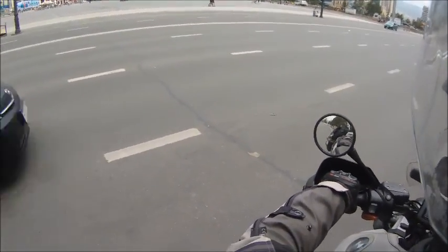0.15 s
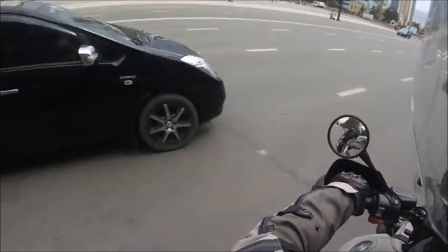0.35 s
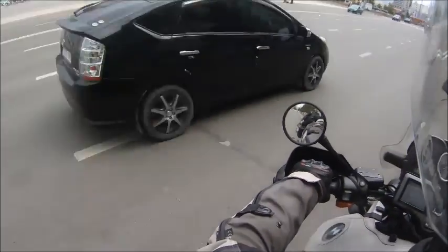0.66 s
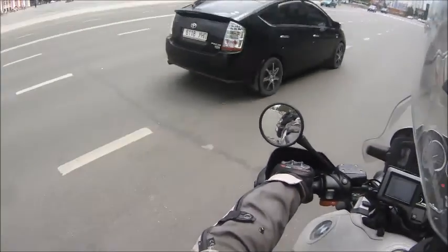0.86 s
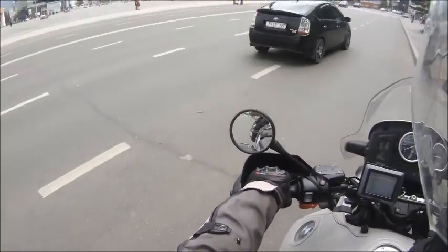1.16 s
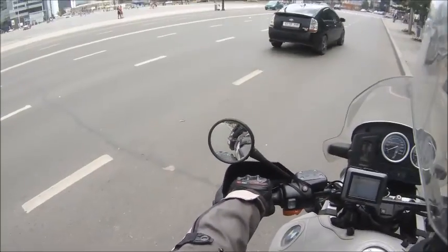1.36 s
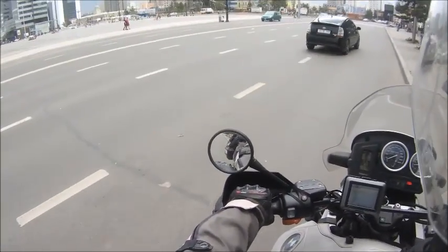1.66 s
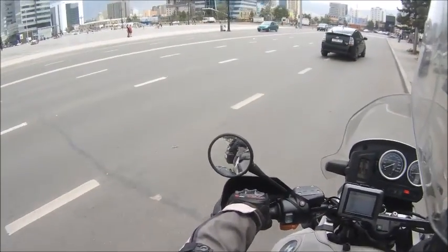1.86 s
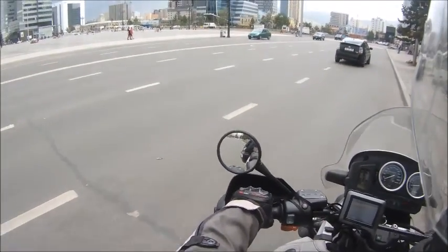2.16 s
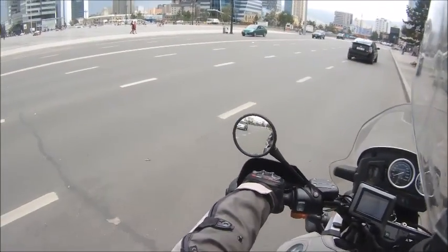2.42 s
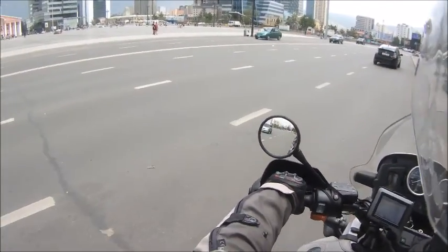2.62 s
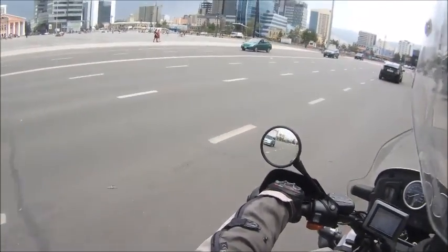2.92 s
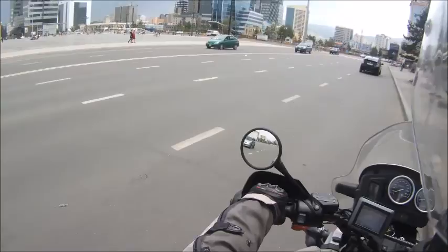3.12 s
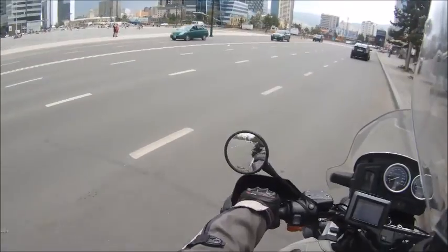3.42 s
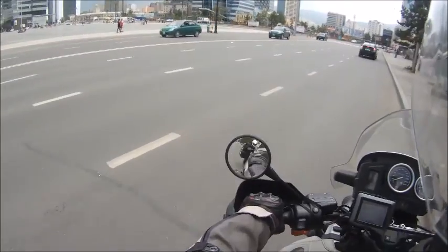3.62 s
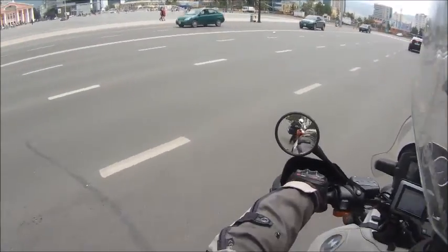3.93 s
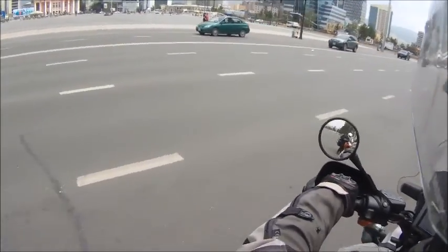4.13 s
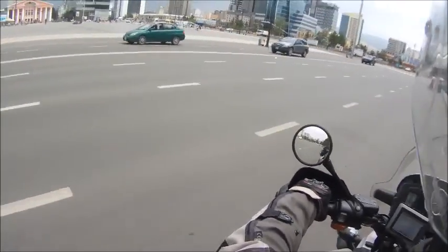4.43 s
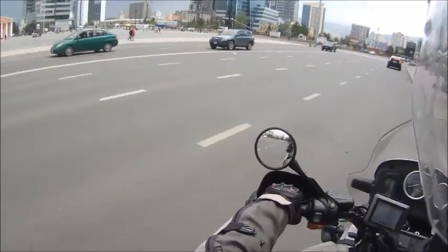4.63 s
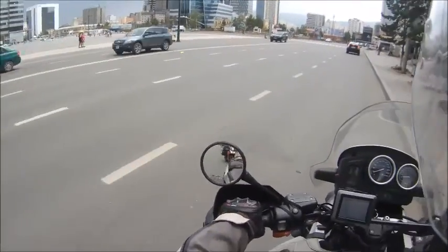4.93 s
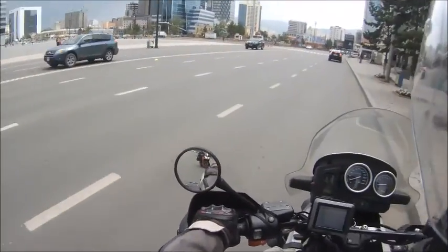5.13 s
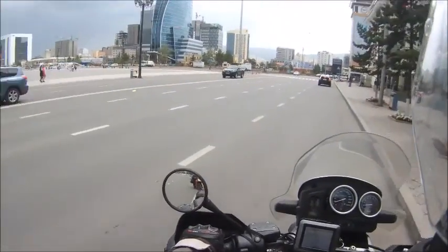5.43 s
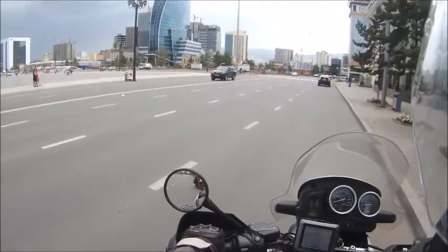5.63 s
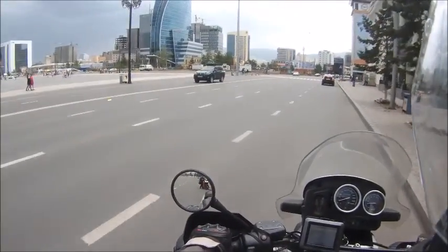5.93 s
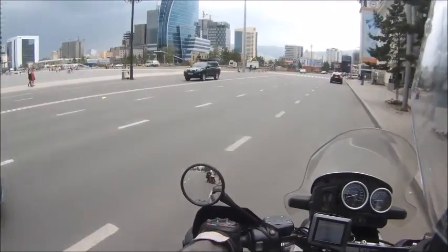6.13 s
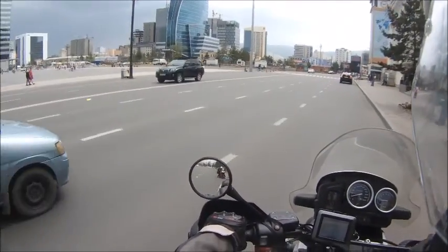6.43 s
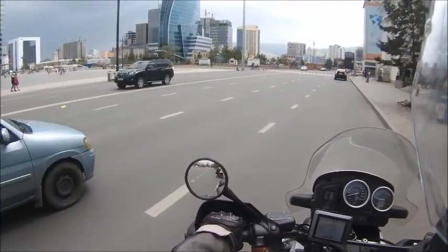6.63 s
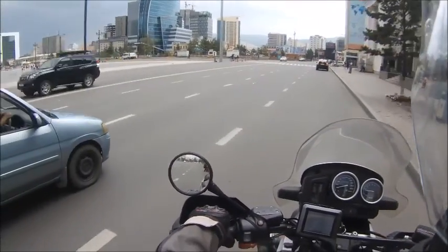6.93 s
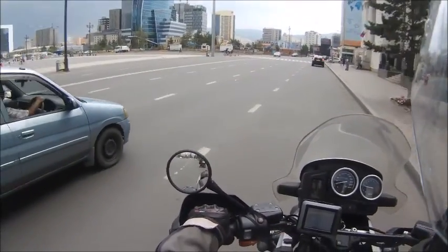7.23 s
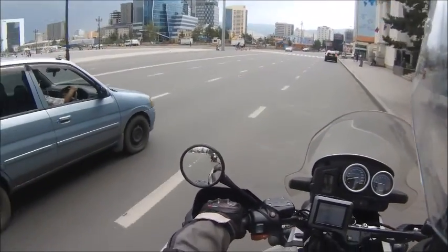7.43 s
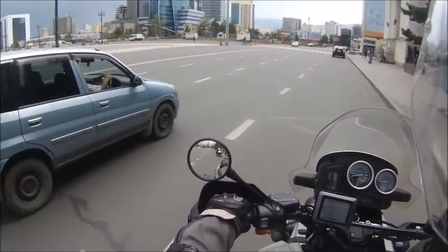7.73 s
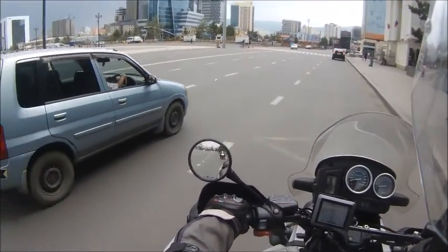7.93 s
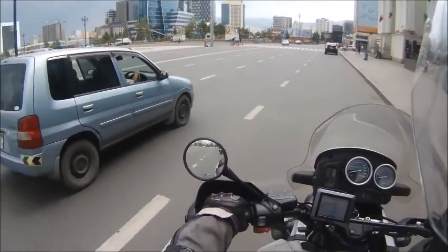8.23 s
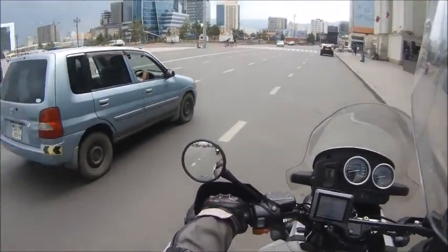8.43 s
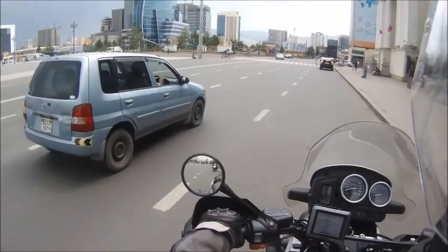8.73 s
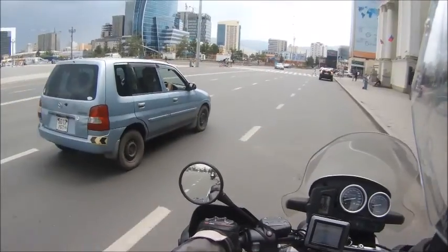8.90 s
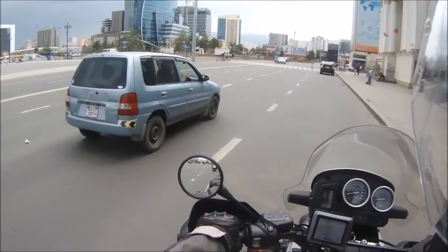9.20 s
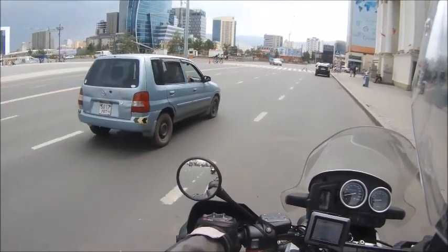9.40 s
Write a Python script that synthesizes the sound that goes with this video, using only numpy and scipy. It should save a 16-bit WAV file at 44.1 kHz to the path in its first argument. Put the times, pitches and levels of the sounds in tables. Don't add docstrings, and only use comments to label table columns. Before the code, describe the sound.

Brake squeal tail and passing tyres, a thumping motorcycle engine climbing slowly in revs, then chain chatter, rough idle and hard slaps of wind.

```python
import sys
import numpy as np
from scipy import signal
from scipy.fft import rfft, irfft, next_fast_len
from scipy.io import wavfile
from scipy.ndimage import uniform_filter1d

SR = 44100
rng = np.random.default_rng(int(sys.argv[2]) if len(sys.argv) > 2 else 0)


def gain_from_db(level_db):
    decades = np.asarray(level_db, float) / 20
    return 10 ** decades


def generate_wav(sig):
    pcm = np.round(np.clip(np.atleast_2d(sig).T, -1, 1) * 32767).astype(np.int16)
    wavfile.write(sys.argv[1], SR, pcm)


N = 421596


def read(table):
    s, *columns = np.transpose(table)
    return [np.interp(np.arange(N) / SR, s, c) for c in columns]


def unit(x):
    return x / np.sqrt(np.mean(x ** 2))


def colour(x, spectrum):
    hz, db = np.transpose(spectrum)
    grid = np.log(np.fft.rfftfreq(N, 1 / SR) + 1)
    return irfft(rfft(x) * gain_from_db(np.interp(grid, np.log(hz), db)), N)


def ring(x, hz, width):
    return signal.lfilter(*signal.iirpeak(hz, hz / max(width, 1), fs=SR), x)


def walk(rate):
    k = int(SR / rate)
    held = np.repeat(rng.standard_normal(N // k + 1), k)
    return unit(uniform_filter1d(uniform_filter1d(held, k), k)[:N])


def patchy(spectrum, shared_db, own_db, own_rate):
    size = next_fast_len(N)
    noise = rfft(colour(rng.standard_normal(N), spectrum), size)
    place = 1.5 * np.log2(np.fft.rfftfreq(size, 1 / SR) / 20 + 1)
    loud = np.bincount(np.round(place).astype(int), abs(noise) ** 2)
    out = 0
    for band in np.flatnonzero(loud > loud.max() * 1e-5):
        sound = irfft(noise * np.clip(1 - abs(place - band), 0, 1), size)[:N]
        out = out + sound * gain_from_db(own_db * walk(own_rate))
    return unit(out * gain_from_db(shared_db))


def causal(spectrum, size=32768):
    hz, db = np.transpose(spectrum)
    grid = np.log(np.fft.rfftfreq(size, 1 / SR) + 1)
    cepstrum = irfft(np.log(gain_from_db(np.interp(grid, np.log(hz), db))))
    cepstrum[1:size // 2] *= 2
    cepstrum[size // 2 + 1:] = 0
    return irfft(np.exp(rfft(cepstrum)))[:size // 4]


def by_revs(hz, cruise_db, per_octave_db):
    return cruise_db + per_octave_db * np.log2(hz / 20)


def add_db(*levels):
    return 10 * np.log10(sum(gain_from_db(db) ** 2 for db in levels))


def squeal():
    end_s, hz, level_db = .083, 3490, -79.5
    t = np.arange(N) / SR
    fade = np.clip((end_s - t) / 0.015, 0, 1)
    phase = 2 * np.pi * np.cumsum(hz * (1 + 0.003 * walk(60) - .08 * t)) / SR
    return gain_from_db(level_db) * fade * (np.sin(phase) + gain_from_db(-8) * np.sin(1.39 * phase))


def exhaust(cycles, hz, thump_db, gas_db, shade):
    at = np.flatnonzero(np.diff(np.floor(cycles)))
    turn = -(-1.) ** np.arange(len(at))
    chance = rng.standard_normal((len(at), 2)).T
    idle = hz[at] < 17.
    late_s = 0.0003 * turn + (0.000095 + 0.0022 * idle) * chance[0]
    uneven_db = 1. + .3 * idle - .55 * (hz[at] > 24)
    blows = np.zeros(N)
    where = np.clip(at + (late_s * SR).astype(int), 0, N - 1)
    blows[where] = gain_from_db((.5 - 3.5 * idle) * turn + uneven_db * chance[1])
    push = uniform_filter1d(blows * gain_from_db(thump_db), int(0.002 * SR))

    # freq_hz, level_db
    silencer = [(5, -53.5), (20, -54), (38, -7.5), (62, -10.5), (85, -2.5), (104, 0.5), (124, -1.5),
                (142, -11.5), (180, -20.5), (300, -43), (620, -39), (680, -45), (760, -46), (1500, -55.5)]
    response = causal(silencer)
    thump = -signal.fftconvolve(push, response / np.abs(response).max())[:N]
    vent_hz, vent_lead_s = 22, .0037
    bend = np.tan(np.pi * vent_hz / SR)
    pole = (bend - 1) / (bend + 1)
    thump = np.roll(signal.lfilter([pole, 1], [1, pole], thump), -int(vent_lead_s * SR))
    heat = np.clip((hz - 22) / 9, 0, 1)
    hot_note = 0.91 * heat * ring(thump, 125.6, 33)
    thump = (1 - 0.57 * heat) * thump + hot_note + 0.66 * ring(thump, 110.2, 13)

    since_strong = cycles - np.round(cycles[at[1]])
    push = push * gain_from_db(2.3 * (1.5 - heat) * np.cos(np.pi * since_strong))
    bark = np.roll(ring(ring(push, 463, 270), 422, 200), int(-.001 * SR))
    cool_pipe = (1 - heat) * ring(ring(push, 235, 250), 235, 50) * 1.15
    hot_pipe = heat * ring(ring(push, 250, 70), 250, 36) * 1.2
    header = np.roll(cool_pipe + hot_pipe, int(-.002 * SR))
    orders = 2 * np.pi * np.outer([8, 9], cycles)
    pair = np.concatenate([np.cos(orders), np.sin(orders)])
    clear = np.sum(pair * uniform_filter1d(pair * header, SR // 8), axis=0)
    header = header + 1.8 * np.sqrt(heat) * clear
    whine = np.sin(47 * np.pi * cycles) + .7 * np.sin(56 * np.pi * cycles)
    gears = gain_from_db(-8 + 3 * walk(5)) * heat * whine

    puff_s = .0085
    puff = np.exp(4 * np.cos(2 * np.pi * (cycles - puff_s * hz)) - 4)
    gas = colour(rng.standard_normal(N), [(60, -29.0), (240, -2.5), (450, 5.0), (700, -12.5),
                                          (1500, -13.0), (3000, -37.0), (5000, -97)])
    whistle = gain_from_db(-10.5 + 2.5 * walk(15)) * unit(ring(gas * (.25 + puff), 690, 40))
    weaker = np.round(cycles) % 2 == np.round(cycles[at[0]]) % 2
    strokes = np.roll(blows * weaker, int(.008 * SR))
    tail_db = -3 - 1.2 * abs(hz - 19.5).clip(0, 4)
    whistle = whistle + gain_from_db(tail_db) * unit(ring(ring(strokes, 678, 60), 678, 30))
    chuff = gain_from_db(-3) * unit(puff * ring(ring(rng.standard_normal(N), 430, 350), 430, 350))
    rush = unit(gas * (1.7 + puff)) + chuff + shade * whistle + gears
    return gain_from_db(11.0) * thump + gain_from_db(45.0 + 2.8 * heat) * (header + gain_from_db(-8) * bark) + gain_from_db(gas_db) * rush


def valve_gear(cycles, hiss_db, tick_db):
    # freq_hz, density_db (dB per Hz)
    hiss_shape = [(1200, -25), (2200, -1), (3500, -3), (6300, -2), (9000, -6), (12500, -8.5), (13300, -4.5),
                  (15300, -3), (15600, -60)]
    # freq_hz, width_hz, level_db
    casing = [(3770, 130, -19), (4680, 25, 9), (4820, 85, 4), (6300, 220, -6), (6900, 44, 4),
              (8250, 84, -5), (9150, 150, -3), (10000, 150, -2)]
    throb = gain_from_db(1.3 * np.cos(2 * np.pi * cycles) + 1.0 * np.cos(4 * np.pi * (cycles - .06)))
    hiss = patchy(hiss_shape, 0.35 * walk(27), 0.25, 8.1) * throb
    ticks = rng.standard_normal(N) * gain_from_db(3. * walk(14) + 4 * np.cos(4 * np.pi * (cycles - .1)))
    rings = sum(gain_from_db(db) * ring(ticks, hz, width) for hz, width, db in casing)
    return gain_from_db(hiss_db + 0.9) * unit(hiss) + gain_from_db(tick_db) * unit(rings)


def traffic():
    # closest_s, tyres_db, roar_over_tyres_db, tread_hiss_over_tyres_db, cover_gap_s
    cars = [
        (0.4, -68.5, 3, -15, 0.24),
        (5.1, -68.5, 4.5, -23, 0.45),
        (6.6, -73, 14, -5, 0.45),
        (7.4, -71, -0.5, -8, 0.5),
        (9.4, -84.5, -2, -1.5, 0.1),
        (.58, -81.5, 3, 2, 0.091),
    ]
    town_tyres_db, town_roar_db = -75.5, -65
    t = np.arange(N) / SR
    near = []
    for s, db, roar, hiss, gap_s in cars:
        near.append((db - 10 * np.log10(1 + ((t - s) / gap_s) ** 2), roar, hiss))
    tyre_db = add_db(town_tyres_db, *(db for db, _, _ in near))
    roar_db = add_db(town_roar_db, *(db + up for db, up, _ in near))
    return tyre_db, roar_db, add_db(*(db + up for db, _, up in near))


def street(tyre_db, roar_db):
    # freq_hz, density_db (dB per Hz)
    roar_shape = [(88, -39.5), (150, 5), (210, -2.5), (298, -4), (363, -7), (631, -9.5), (1040, -15),
                  (2520, -37), (3500, -30.5), (4550, -40), (7700, -120)]
    # freq_hz, density_db (dB per Hz)
    tyre_shape = [(400, -15), (700, -4.5), (1000, 1.5), (1750, -5), (2050, -11), (2500, -14), (3500, -23),
                  (6000, -35)]
    # freq_hz, density_db (dB per Hz)
    rumble_shape = [(4, -29), (20, -7), (40, -5), (90, 2), (200, -15), (400, -35), (900, -101)]
    roar = gain_from_db(roar_db + 2.5) * patchy(roar_shape, 1.6 * walk(6), 1.0, 12)
    tyres = gain_from_db(tyre_db + 2.5) * unit(colour(rng.standard_normal(N), tyre_shape))
    rumble = gain_from_db(-65.5) * unit(colour(rng.standard_normal(N), rumble_shape))
    return roar + tyres + rumble


def drone():
    # loudest_s, level_db, fade_s
    drones = [
        (.06, -71, 0.2),
        (5.45, -70, 0.27),
    ]
    t = np.arange(N) / SR
    level = sum(gain_from_db(db) * np.exp(-((t - s) / fade_s) ** 2) for s, db, fade_s in drones)
    return level * gain_from_db(4.8 * walk(16)) * unit(ring(rng.standard_normal(N), 900, 210))


def wind():
    # freq_hz, density_db (dB per Hz)
    eddy = [(18, -24), (40, 2), (110, 8.5), (250, 5), (370, -4.5), (520, -3), (800, -17), (1400, -59),
            (2200, -41), (3500, -72)]
    # strongest_s, level_db, rise_s, fall_s
    gusts = [(0.17, -54, 0.052, 0.1), (0.74, -55.5, 0.33, 0.09), (1.12, -51, 0.049, 0.039),
             (1.3, -60, 0.11, 0.26), (2.1, -54.5, 0.11, 0.064), (2.44, -52, 0.018, 0.019),
             (8.0, -60, 0.022, 0.025), (8.15, -50, 0.057, 0.039), (8.26, -50.5, 0.031, 0.027),
             (8.571, -51, 0.11, 0.064), (8.78, -50.5, 0.027, 0.04), (8.89, -42.5, 0.012, 0.054),
             (9.1, -50, 0.041, 0.031), (9.26, -46.5, 0.11, 0.077), (9.4, -43, 0.015, 0.013),
             (9.516, -41.5, 0.045, 0.0076), (9.555, -42, 0.0073, .05), (1.075, -49, 0.045, 0.013),
             (9.355, -57, 0.007, 0.0055)]
    # crest_s, peak_db, pitch_hz, fade_cycles
    buffets = [(8.728, -42.5, 244, 1.4), (8.767, -36.5, 269, 0.61), (8.774, -40.5, 442, 0.63),
               (8.801, -36.5, 200, 0.51), (8.833, -29.5, 454, 0.36), (8.88, -33.9, 362, 1.3),
               (8.894, -48, 221, 2.7), (8.901, -41, 442, 1.3), (8.912, -36, 525, 1.3),
               (8.925, -52, 272, 2.5), (8.942, -39, 199, 1.5), (8.947, -28.2, 530, 0.34),
               (8.972, -34, 397, 0.41), (8.983, -46, 221, 0.7), (9.003, -34.5, 297, 0.93),
               (9.033, -36.7, 328, 0.39), (9.038, -36, 297, 0.45), (9.088, -46, 269, 2.3),
               (9.094, -45.0, 366, 2.5), (9.102, -35.4, 328, 0.45), (9.115, -37.5, 244, 0.45),
               (9.123, -43.8, 362, 2.7), (9.153, -39, 406, 0.39), (9.173, -49, 244, 1.7),
               (9.189, -55, 269, 2.5), (9.213, -50, 200, 2.2), (9.254, -39.5, 530, 3.3),
               (9.262, -36.5, 362, 2.7), (9.269, -58, 297, 2.5), (9.283, -42, 297, 2.3),
               (9.294, -44.5, 400, 1.6), (9.301, -37.9, 488, 0.45), (9.324, -38, 362, 0.55),
               (9.34, -44.2, 398, 1.1), (9.35, -33, 324, 1.5), (9.359, -32, 300, 0.55),
               (9.371, -44, 328, 0.45), (9.386, -33.5, 330, 1.2), (9.399, -29.5, 362, 0.41),
               (9.403, -44, 362, 0.7), (9.411, -39, 328, 1.3), (9.418, -36, 221, 0.7),
               (9.449, -44.8, 328, 1.1), (9.476, -40, 488, 0.6), (9.491, -42, 402, 2),
               (9.505, -51, 269, 2.5), (9.511, -41, 442, 1.7), (9.522, -41, 244, 1.9),
               (9.526, -50, 362, 1.8), (9.546, -43.4, 442, 2.8)]
    # crest_s, peak_db, pitch_hz, fade_cycles
    strays = [(1.055, -44, 250, 0.54), (1.062, -45.5, 246, 1.7), (1.088, -49, 440, 2.5),
              (1.129, -40, 330, 1.1), (1.136, -43, 228, 1.7), (.892, -51, 650, 1.1),
              (5.257, -44.5, 356, 1.4), (7.756, -48.5, 200, 0.88), (7.994, -45, 286, 0.74),
              (8.106, -44, 245, .5), (8.147, -41, 250, 0.45), (8.158, -43, 406, 1.3),
              (8.167, -39, 250, 0.75), (8.208, -48, 330, .8), (8.251, -43.5, 230, 3.2),
              (8.287, -45, 305, .8), (8.472, -48, 297, 2.5), (8.484, -47, 350, 0.83),
              (8.577, -43.5, 327, 0.98), (9.554, -41, 197, 2.5), (1.125, -42.5, 735, 3.2),
              (1.127, -50, 1300, 1.5), (9.449, -51, 750, 1.1), (8.774, -51, 800, 0.97),
              (8.806, -40.5, 467, 2.7), (8.877, -38, 487, 1.2), (8.946, -33.5, 1190, 1.5),
              (8.95, -39, 700, 1), (8.947, -38.5, 2020, 2.5), (9.033, -52, 1500, 1.5),
              (8.146, -45, 690, 1.3), (9.199, -48, 700, 1), (9.037, -43, 730, 1.9),
              (9.088, -36.5, 720, 1.1), (9.249, -37.5, 660, 0.62), (9.258, -43, 714, 1.9),
              (9.347, -35.5, 655, 0.51), (9.358, -39, 810, 1.4), (9.387, -34.5, 660, 0.69),
              (9.509, -47, 646, 1.9), (9.524, -32.5, 595, 1)]
    out = np.zeros(N + SR)
    flutter = patchy(eddy, 4 * np.tanh(.6 * walk(130)) + 0.5 * walk(35), 1.5, 30)
    flutter = flutter / np.sqrt(uniform_filter1d(flutter ** 2, SR // 25) + .05)
    for s, db, rise_s, fall_s in gusts:
        late = np.arange(N) / SR - s
        pace_s = np.maximum(np.where(late < 0, rise_s, fall_s), .005)
        out[:N] += flutter * gain_from_db(db) * np.exp(-abs(late) / pace_s)

    t = np.arange(-SR // 100, SR // 30) / SR
    port = signal.butter(4, 1500, fs=SR, output="sos")
    grit = rng.standard_normal((100, len(t)))
    for (s, peak_db, hz, fall), noise in zip(list(buffets) + list(strays), grit):
        turns, fall = t * hz, max(fall, .68)
        swell = .3 + .35 * fall
        shape = np.exp(-(turns / np.where(turns < 0, swell, fall)) ** 2)
        slap = shape * np.cos(2 * np.pi * turns)
        thud = gain_from_db(-12.5) * np.exp(-(turns / 1.1) ** 2) * np.cos(2 * np.pi * (turns / 3 + 0.16))
        fray = gain_from_db(-15.5) * shape * unit(ring(noise, 2 * hz, 2 * hz))
        start = int(s * SR) - SR // 100
        out[start:start + len(t)] += gain_from_db(peak_db - 0.6) * signal.sosfilt(port, slap + thud + fray)
    return out[:N]


def clinks(cycles):
    # start_s, peak_db, pitch_hz
    metal = [
        (1.546, -64, 3190),
        (1.833, -74, 2800),
        (3.379, -58, 2830),
        (3.38, -70, 5730),
        (3.687, -66, 6670),
        (3.81, -71, 4670),
        (3.904, -63, 4680),
        (5.743, -63, 4480),
        (6.199, -77, 4830),
    ]
    start_s, end_s, chain_db, chain_hz, per_firing = 7.59, 8.2, -65.5, 3250, 1.6
    t60_s, rise_s = .075, 0.00084
    out, t = np.zeros(N + SR), np.arange(SR // 4) / SR
    swings = per_firing * (cycles - cycles[int(start_s * SR)])
    at = np.flatnonzero(np.diff(np.floor(swings + 1e-9))) / SR
    at = at[(at >= start_s - .001) & (at < end_s)]
    spread = rng.standard_normal((40, 2))
    chatter = [(s, chain_db + 2.5 * a, chain_hz * (1 + 0.018 * b)) for s, (a, b) in zip(at, spread)]
    shakes = rng.standard_normal((48, len(t)))
    for (s, peak_db, hz), shake in zip(list(metal) + chatter, shakes):
        shake = shake * np.exp(-np.log(1000) * t / t60_s) * np.minimum(t / rise_s, 1)
        sound = ring(shake, hz, 300) + 0.6 * (hz < 3000) * ring(shake, 2 * hz, 500)
        sound = sound + .35 * np.exp(-t / .004) * ring(shake, 1.4 * hz, 1.2 * hz)
        start = int(s * SR)
        out[start:start + len(t)] += gain_from_db(peak_db - 1.5) * sound / np.abs(sound).max()
    return out[:N]


def two_ports(mid):
    # freq_hz, side_minus_mid_db
    width = [(60, -65), (110, -74), (200, -54), (380, -29.5), (690, -25.5), (1270, -25), (2340, -13.5),
             (4320, -12.5), (7950, -11.5), (14600, -5.5)]
    paths = rng.standard_normal(8000) * np.exp(-np.arange(8000) / 2200)
    scattered = signal.fftconvolve(mid, paths / np.linalg.norm(paths))[:N]
    side = gain_from_db(2.0) * colour(scattered, list(width[:-1]) + [(12600, -12.0), (12800, -71)])
    side = side + gain_from_db(-48.0 + 13 * walk(15)) * ring(scattered, 260, 200)
    return np.array([mid + side, mid - side])


def scene():
    # time_s, firing_rate_hz
    revs = [(0.0, 14.76), (0.6, 22.18), (0.92, 23.6), (1.27, 21.87), (2.01, 19.73), (2.55, 19.51),
            (3.83, 21.8), (4.42, 19.56), (5.05, 21.99), (5.21, 21.33), (6.43, 26.9), (7.04, 30.3),
            (7.4, 31.81), (7.6, 25.57), (7.74, 22.99), (7.92, 15.49), (8.45, 16.09), (9.56, 15.96)]
    # time_s, exhaust_thump_db
    throttle = [(0.0, -63), (0.15, -57), (0.7, -53), (1.4, -52.5), (1.95, -53), (3.0, -52), (3.95, -51.5),
                (4.15, -52), (5.5, -52), (6.75, -49), (7.3, -47.5), (7.4, -48.5), (7.56, -57.5),
                (7.88, -64.5), (8.05, -57.5), (8.3, -65.5), (8.6, -56.5), (9.56, -59.5)]
    hz, = read(revs)
    load_db, = read(throttle)
    start_cycle, lead_s = .07, .0062
    cycles = start_cycle + np.cumsum(hz) / SR + lead_s * hz
    tyre_db, roar_db, tread_db = traffic()
    engine_hiss_db = by_revs(hz, -84, 13.8) - 3 + 0.62 * np.clip(load_db + 57, -8, 0)
    idle_hiss_db = -82.5
    hiss_db = add_db(engine_hiss_db, idle_hiss_db, tread_db)
    turn_s, half_s, dull_db, mute_db = 4.47, .33, -2.5, -5
    shade = np.exp(-((np.arange(N) / SR - turn_s) / half_s) ** 4)
    bike = exhaust(cycles, hz, load_db, by_revs(hz, -71.5, 10.8), 1 - 0.6 * shade)
    rattle_db = by_revs(hz, -88.5, 5.9) + mute_db * shade
    bike = bike + valve_gear(cycles, hiss_db + dull_db * shade, rattle_db) + clinks(cycles)
    mid = bike + street(tyre_db, roar_db) + squeal() + drone()
    return two_ports(mid) + wind()


def band_limit(x):
    return signal.sosfilt(signal.butter(12, 15250, fs=SR, output="sos"), x)


def record(dry):
    x = signal.sosfilt(signal.butter(1, 12, "high", fs=SR, output="sos"), dry)
    return band_limit(x)


dry = scene()
out = record(dry)
generate_wav(out)
```